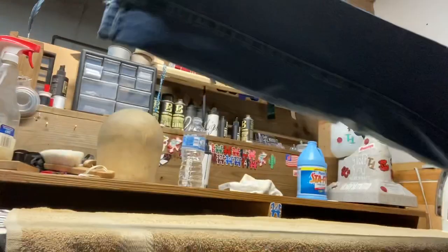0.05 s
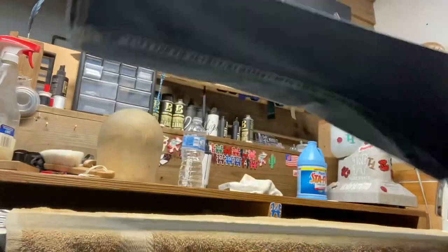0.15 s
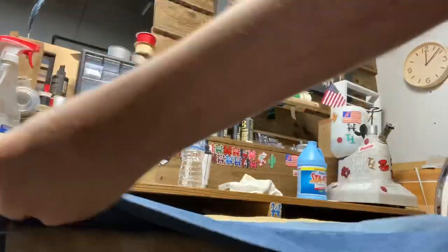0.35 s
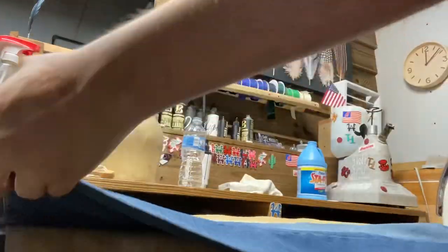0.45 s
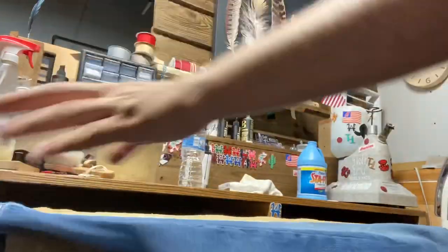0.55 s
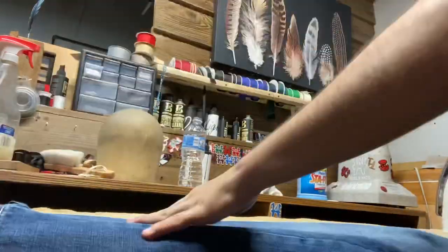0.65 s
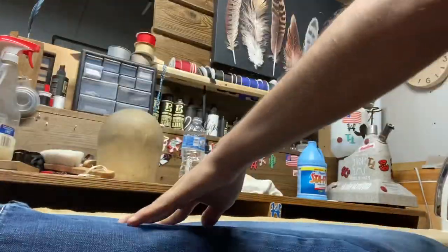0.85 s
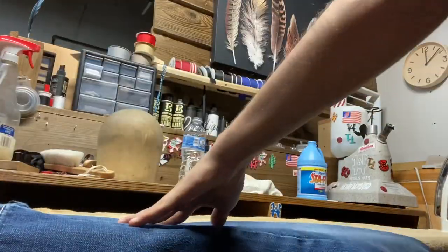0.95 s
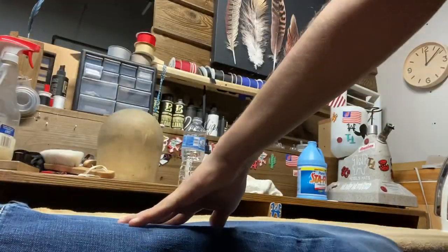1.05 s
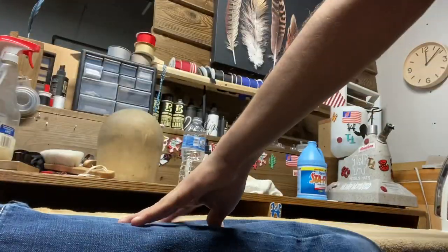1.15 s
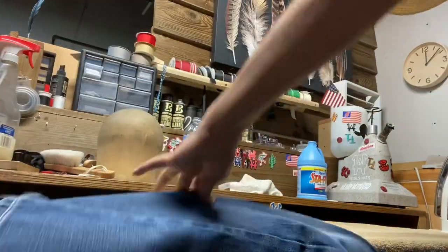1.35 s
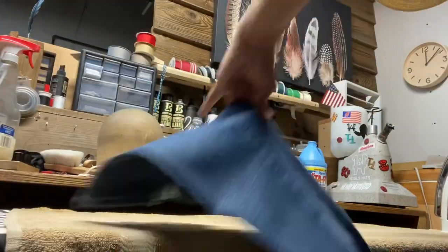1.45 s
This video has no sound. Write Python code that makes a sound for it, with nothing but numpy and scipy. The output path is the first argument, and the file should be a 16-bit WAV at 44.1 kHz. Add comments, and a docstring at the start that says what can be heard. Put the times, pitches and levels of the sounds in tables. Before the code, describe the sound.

A pair of jeans swishes briefly and flops onto a padded table at about 0.2 seconds, a slapping thump that is the loudest sound. A seam ticks, a button knocks near 0.45 seconds, and the cloth rustles softly. From 1.0 to 1.2 seconds a hand drags over the denim with a low juddering rub, then lighter pats and strokes continue until 1.5 seconds in a small, quiet room.

```python
"""A pair of jeans swishes through the air and flops on a padded table in a small workshop.
Sliding threads snag and hiss; folds slap down, ring the table top and thud into the padding.
Seams tick, stitching snaps, a button knocks. A hand pats and smooths the denim; where it
drags hard it sticks and slips, and the table top drones."""
import sys
import numpy as np
from scipy import signal
from scipy.fft import rfft, irfft
from scipy.io import wavfile
from scipy.ndimage import uniform_filter1d

SR = 44100
rng = np.random.default_rng(int(sys.argv[2]) if len(sys.argv) > 2 else 0)


def log_audio(samples):
    """Write samples as a 16-bit WAV file to the path given in sys.argv[1]."""
    # one column per channel
    frames = np.atleast_2d(samples).T
    # limit to full scale, then quantise
    limited = np.clip(frames, -1, 1)
    pcm = np.round(limited * 32767).astype(np.int16)
    wavfile.write(sys.argv[1], SR, pcm)


N = 66150
T = np.arange(N) / SR

# sliding speed, as a level curve: t/s, level/dB
CLOTH_SPEED = [(0, -75), (0.08, -78), (0.106, -59), (0.135, -57.5), (0.172, -47.5), (0.205, -50),
               (0.245, -83), (0.29, -60), (0.34, -56), (0.395, -68.5), (0.44, -65), (0.50, -65),
               (0.585, -59), (0.62, -66), (0.665, -69.5), (0.715, -78)]
HAND_SPEED = [(0.72, -76.5), (0.80, -68), (0.88, -66.5), (0.95, -59.5), (1.0, -55.5), (1.04, -55),
              (1.09, -60.5), (1.145, -68), (1.195, -74), (1.255, -60), (1.285, -62), (1.355, -56),
              (1.41, -67.5), (1.425, -65), (1.462, -58.5), (1.5, -62)]
# billowing denim, light skims, firm fingertip rubs: centre t/s, half width/s, level/dB
BILLOWS = [(0.02, 0.035, -55.5), (0.097, 0.016, -59.5), (0.17, 0.033, -52.5), (0.595, 0.019, -52),
           (0.772, 0.02, -60)]
SKIMS = [(0.125, 0.029, -55.5), (0.665, 0.011, -71.5), (0.925, 0.06, -66), (1.235, 0.023, -66.5)]
RUBS = [(0.59, 0.046, -63.5), (0.99, 0.036, -58.5), (1.14, 0.026, -54.5), (1.47, 0.039, -57)]
# dragging fold, palm, fingertip, one curve each: t/s, force/dB, slip rate/Hz
DRAGS = [
    [(0, -54, 280), (0.011, -50, 345), (0.022, -55, 260), (0.05, -70, 230)],
    [(1.010, -55, 220), (1.019, -32.5, 210), (1.045, -36, 170), (1.055, -46, 205), (1.10, -43.5, 194),
     (1.123, -46.5, 205), (1.15, -57, 180), (1.185, -74, 175)],
    [(1.095, -62, 350), (1.114, -44, 338), (1.135, -46.5, 328), (1.16, -55, 334), (1.205, -69, 360)],
]
# hem or fingertip taps: t/s, level/dB, centre f/Hz
TAPS = [(0.026, -51, 900), (0.031, -52, 1200), (0.3485, -44.5, 1350), (1.2135, -52, 1450)]
# weight settling on the padding: peak t/s, level/dB, rise/s, upper mode re lower/dB
THUDS = [(0.037, -52.5, 0.0043, 1.5), (0.095, -58.5, 0.0041, 6.5), (0.166, -52, 0.014, 6),
         (0.221, -25.5, 0.0042, -7), (0.322, -52, 0.0017, -12), (0.453, -51, 0.0043, -25),
         (0.559, -53, 0.0028, -11), (0.603, -47.5, 0.0033, -2.5), (0.765, -52.5, 0.00068, -2),
         (0.916, -54, 0.0019, -6), (1.354, -60.5, 0.0027, 5.5)]
# folds landing: t/s, cloth level/dB, decay/s, table ring/dB, L-R/dB
SLAPS = [(0.165, -61.5, 0.019, -63, -16), (0.2103, -42, 0.0048, -57, 6), (0.2138, -31, 0.003, -43, -3),
         (0.2200, -25, 0.004, -47, 1), (0.2245, -41, 0.014, -34, 0), (0.758, -89, 0.0037, -68.5, 10),
         (0.908, -56.5, 0.0085, -60, -1.5), (1.343, -53.5, 0.008, -61, 1)]
# stitching snaps; seam and fingernail ticks: t/s, level/dB, L-R/dB
SNAPS = [(0.2139, -36, -2), (0.2203, -26.5, 0), (0.2217, -23, 2), (0.2325, -30, -7), (0.5786, -52, 3),
         (0.5906, -42, 1), (0.5982, -44, -2)]
TICKS = [(0.2329, -44, -3), (0.3469, -42.5, 1), (0.5915, -55, 19)]
# thick seam landing: t/s, level/dB, f/Hz, decay/s
SEAM_BLOWS = [(0.2243, -18, 480, 0.0015)]
# button hit and bounce: t/s, ring/dB, click/dB, L-R/dB
BUTTON_HITS = [(0.443, -41.5, -40, 1), (0.4468, -37.5, -61, -5)]

# table top under a drag: f/Hz, bandwidth/Hz, level/dB
DRONE_MODES = [(192, 75, 0), (334, 30, -3.5), (470, 70, -25), (640, 90, -21)]
# ring of the struck table top and of the button knock: f/Hz, level/dB, t60/s
TABLE_MODES = [(228, -11, .08), (290, -7, .06), (335, -6, .08), (380, -9, .14), (450, 3, .06),
               (565, -4, .08), (635, -4, .13), (700, -5, .08), (842, -12, .12), (1090, -11, .07),
               (1275, -11, .05), (1440, -11, .05), (1690, -9, .05)]
BUTTON_MODES = [(295, -21, 0.1), (449.6, -11, 0.064), (800, -15, 0.04), (890, 0, .046), (975, -5, 0.04),
                (1130, -8, 0.06), (1490, -14, 0.044), (1916, -24, 0.05), (2270, -3, 0.06),
                (2780, -10, 0.04), (3560, -12, 0.04), (4110, -11, 0.04), (4390, -11, 0.04)]

# noise spectra by source: f/Hz, relative level/dB
CLOTH_SPECTRUM = [(60, -13), (200, -1), (500, 0.5), (1300, -2), (2400, -3.5), (3300, -7), (6000, -12.5),
                  (10000, -14.5), (13000, -18.5), (16000, -44)]
HAND_SPECTRUM = [(60, -26), (200, -9), (550, -8.5), (1050, 2.5), (1600, -1), (2500, -1), (3500, -3.5),
                 (6000, -9), (10000, -12), (13000, -19.5), (16000, -24)]
BILLOW_SPECTRUM = [(40, -17.5), (90, -0.5), (200, 5), (330, -9), (500, -11), (1000, -28), (4000, -62)]
SKIM_SPECTRUM = [(1000, -12), (5000, -6), (10000, -1), (13000, -1), (16000, -4)]
RUB_SPECTRUM = [(60, -32), (190, 3), (350, -7), (600, -8), (950, 1), (1350, -7), (1900, -6.5), (3000, -15),
                (6000, -31), (16000, -56)]
SCRAPE_SPECTRUM = [(60, -51.5), (130, 5), (215, 8), (270, 10.5), (335, -2), (410, -3), (620, 5), (850, -7),
                   (1400, -10.5), (2500, -18), (5000, -43), (16000, -49)]
SLAP_SPECTRUM = [(40, -27), (100, -9), (300, -14.5), (700, 2.5), (950, -12), (1600, -1), (2000, -8),
                 (2500, 1.5), (3200, -22.5), (3900, -9.5), (4600, -27), (6000, -27), (10000, -34),
                 (16000, -58)]
SNAP_SPECTRUM = [(100, -33), (700, 7), (2000, 7), (5000, -4), (9000, -10), (12000, -10.5), (16000, -20)]
TICK_SPECTRUM = [(100, -47), (700, 0.5), (1050, 6.5), (1350, -1), (1700, -5.5), (2300, -6.5), (3700, -4),
                 (6000, -15), (10000, -22.5), (16000, -24)]
RUMBLE_SPECTRUM = [(20, -41), (45, -17), (70, -2.5), (100, 1.5), (200, -4.5), (400, -12), (1000, -19.5),
                   (2500, -27.5), (5000, -33.5), (10000, -34), (16000, -29.5)]

# room decay: f/Hz, t60/s
ROOM_T60 = [(60, 0.16), (250, 0.1), (1000, 0.19), (4000, 0.25), (16000, 0.11)]
# reflection strength: f/Hz, level/dB
ROOM_SEND = [(60, -13), (110, -11), (220, -5), (500, -9), (1500, -14.5), (4000, -11.5), (16000, -5)]
# microphone pair: f/Hz, L-R correlation
MIC_CORRELATION = [(50, 0.65), (200, 0.81), (500, 0.63), (1000, 0.015), (2000, 0.35), (4000, 0.011),
                   (12000, -0.28)]


def amp(db):
    """dB to gain."""
    return 10 ** (np.asarray(db) / 20)


def unit_rms(x):
    """Scales to rms 1."""
    return x / np.sqrt(np.mean(x ** 2) + 1e-20)


def at_hz(points, hz):
    """Interpolates on a log-frequency axis."""
    f_hz, values = np.transpose(points)
    return np.interp(np.log(hz + 1), np.log(f_hz), values)


def envelope(points):
    """Gain from a dB curve, silent outside it."""
    return amp(np.interp(T, *np.transpose(points), left=-200, right=-200))


def swells(rows):
    """Gain of bell-shaped strokes."""
    return sum(amp(db) * np.exp(-((T - t_s) / half_s) ** 2) for t_s, half_s, db in rows)


def burst(start_s, decay_s):
    """Instant attack, exponential decay."""
    return (T >= start_s) * np.exp(-np.maximum(T - start_s, 0) / decay_s)


def ring(start_s, modes):
    """Decaying modes, struck together."""
    age_s = np.maximum(T - start_s, 0)
    return sum(amp(db - 60 * age_s / t60_s) * np.sin(2 * np.pi * hz * age_s) for hz, db, t60_s in modes)


def pan(side_db):
    """L and R gains."""
    return amp([[side_db / 2], [-side_db / 2]])


def conv(x, impulse):
    """Convolves per channel."""
    return signal.fftconvolve(np.atleast_2d(x), np.atleast_2d(impulse), axes=1)[:, :N]


def colour(x, spectrum, size=4096):
    """Minimum-phase filter of unit energy."""
    log_gain = np.log(amp(at_hz(spectrum, abs(np.fft.fftfreq(size, 1 / SR)))))
    impulse = np.fft.ifft(np.exp(np.conj(signal.hilbert(log_gain)))).real[:size // 2]
    return conv(x, impulse / np.linalg.norm(impulse))


def high_pass(x, hz):
    """Fourth-order bass cut."""
    return signal.sosfilt(signal.butter(4, hz, "high", fs=SR, output="sos"), x)


def mic_pair(pair):
    """Two independent signals to L and R, alike in the bass."""
    corr = at_hz(MIC_CORRELATION, np.fft.rfftfreq(N, 1 / SR))
    mid, side = irfft(rfft(pair) * np.sqrt([(1 + corr) / 2, (1 - corr) / 2]), N)
    return np.array([mid + side, mid - side])


def noise():
    """White noise at both microphones."""
    return mic_pair(rng.standard_normal((2, N)))


def friction(speed, spectrum, snags_per_s=3500, snag_share=0.25, clump_db=1.6, clump_s=0.006):
    """Threads snag in clumps: hiss with tiny snaps, amplitude proportional to speed."""
    snags = rng.standard_normal((2, N)) * amp(0.5 * np.minimum(rng.exponential(1, (2, N)), 4))
    snags *= rng.random((2, N)) < snags_per_s / SR
    clumps = amp(clump_db * unit_rms(uniform_filter1d(rng.standard_normal(N), round(clump_s * SR))))
    hiss = np.sqrt(snag_share) * unit_rms(mic_pair(snags)) + np.sqrt(1 - snag_share) * noise()
    return colour(hiss * speed * clumps, spectrum)


def judder(rate_jitter=0.055, slip_spread_db=1.5, scrape_db=-7):
    """Uneven stick-slip pulses drive the table top to a drone, with a dull scrape."""
    top = sum(amp(db) * width_hz * np.exp(-np.pi * width_hz * T) * np.sin(2 * np.pi * hz * T)
              for hz, width_hz, db in DRONE_MODES)
    drone, total_force = 0, 0
    for drag in DRAGS:
        t_s, force_db, rate_hz = np.transpose(drag)
        uneven = 1 + rate_jitter * unit_rms(uniform_filter1d(rng.standard_normal(N), size=300))
        cycles = np.cumsum(np.interp(T, t_s, rate_hz) * uneven * (T >= t_s[0])) / SR
        slips = np.diff(np.floor(cycles), prepend=0)  # one pulse per cycle
        force = envelope(np.transpose([t_s, force_db]))
        pulses = slips * force * amp(slip_spread_db * rng.standard_normal(N))
        steady_rms = np.std(conv(slips, top)[0, (T > t_s[0]) & (T < t_s[-1])])
        drone += conv(pulses, top) / steady_rms
        total_force += force
    scrape = amp(scrape_db) * colour(noise() * total_force, SCRAPE_SPECTRUM)
    return high_pass(drone * pan(side_db=-1) + scrape, hz=120)


def taps(decay_s=0.007, width_oct=0.45):
    """Soft, hollow contacts: a noise puff in one midrange resonance."""
    out = np.zeros((2, N))
    edge_ratio = 2 ** (width_oct / 2)
    for t_s, db, hz in TAPS:
        band = signal.butter(1, [hz / edge_ratio, hz * edge_ratio], "band", fs=SR, output="sos")
        out += amp(db) * unit_rms(signal.sosfilt(band, noise())) * burst(t_s, decay_s)
    return out


def thuds(lower_hz=104, upper_hz=190, lower_decay_s=0.0095, upper_decay_s=0.011):
    """Padding takes the weight gradually: air squeezed out of the cloth swells and dies in two low tones."""
    out = np.zeros(N)
    for peak_s, db, rise_s, upper_db in THUDS:
        t_s = T - peak_s
        for hz, mode_db, decay_s in [(lower_hz, 0, lower_decay_s), (upper_hz, upper_db, upper_decay_s)]:
            swell = np.exp(np.minimum(t_s / rise_s, -t_s / decay_s))
            out += amp(db + mode_db) * swell * np.cos(2 * np.pi * hz * t_s)
    return out


def slaps():
    """Each fold gives a burst of cloth noise and rings the table top."""
    cloth = sum(amp(db) * pan(side_db) * burst(t_s, decay_s) for t_s, db, decay_s, _, side_db in SLAPS)
    top = sum(amp(db) * pan(side_db) * ring(t_s, TABLE_MODES) for t_s, _, _, db, side_db in SLAPS)
    return top + colour(cloth * noise(), SLAP_SPECTRUM)


def clicks(rows, spectrum, decay_s):
    """Stiff threads, seams or nails make brief, bright noise bursts."""
    gain = sum(amp(db) * pan(side_db) * burst(t_s, decay_s) for t_s, db, side_db in rows)
    return colour(noise() * gain, spectrum)


def seam_blow():
    """A thick seam hits through the padding: one heavily damped swing of the top."""
    return sum(amp(db) * burst(t_s, decay_s) * np.sin(2 * np.pi * hz * (T - t_s))
               for t_s, db, hz, decay_s in SEAM_BLOWS)


def button_knocks(click_decay_s=0.017, left_lag_s=91e-6):
    """A button hits and bounces, right of centre: hard click, brief woody ring."""
    out = np.zeros((2, N))
    for t_s, ring_db, click_db, side_db in BUTTON_HITS:
        click = colour(noise() * burst(t_s, click_decay_s), TICK_SPECTRUM)
        tone = np.array([ring(t_s + left_lag_s, BUTTON_MODES), ring(t_s, BUTTON_MODES)])
        out += pan(side_db) * (amp(ring_db) * tone + amp(click_db) * click)
    return out


def room(x, predelay_s=0.0014):
    """Small, cluttered room: dense reflections decaying band by band."""
    hz, t_s, bands = signal.stft(noise()[:, :SR // 2], SR, nperseg=256)
    t60_s = at_hz(ROOM_T60, hz)[:, None]
    decay = amp(at_hz(ROOM_SEND, hz)[:, None] - 60 * t_s / t60_s)
    energy_norm = np.sqrt(2 * np.log(1000) / (t60_s * SR))
    tail = signal.istft(bands * decay * energy_norm, SR, nperseg=256)[1]
    fade_in = np.clip(T[:tail.shape[1]] / predelay_s - 1, 0, 1)
    return conv(x, tail * fade_in)


def scene(rumble_db=-66):
    """Jeans, hand and table in the room, over its quiet rumble."""
    direct = friction(envelope(CLOTH_SPEED), CLOTH_SPECTRUM)
    direct += friction(envelope(HAND_SPEED), HAND_SPECTRUM)
    direct += friction(swells(BILLOWS), BILLOW_SPECTRUM)
    direct += friction(swells(SKIMS), SKIM_SPECTRUM)
    direct += friction(swells(RUBS), RUB_SPECTRUM)
    direct += thuds() + slaps() + seam_blow() + taps()
    direct += clicks(TICKS, TICK_SPECTRUM, decay_s=0.0052)
    direct += clicks(SNAPS, SNAP_SPECTRUM, decay_s=0.0006)
    direct += button_knocks() + judder()
    return direct + room(direct) + amp(rumble_db) * colour(noise(), RUMBLE_SPECTRUM)


def record(dry, low_cut_hz=62, high_cut_hz=16000):
    """Microphone bass roll-off and band limit."""
    low_pass = signal.firwin(511, high_cut_hz, window=("kaiser", 9), fs=SR)
    return signal.oaconvolve(high_pass(dry, low_cut_hz), low_pass[None], "same")


dry = scene()
out = record(dry)
log_audio(out)
```